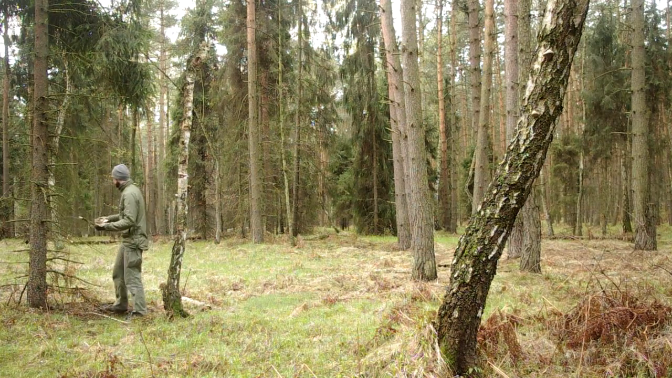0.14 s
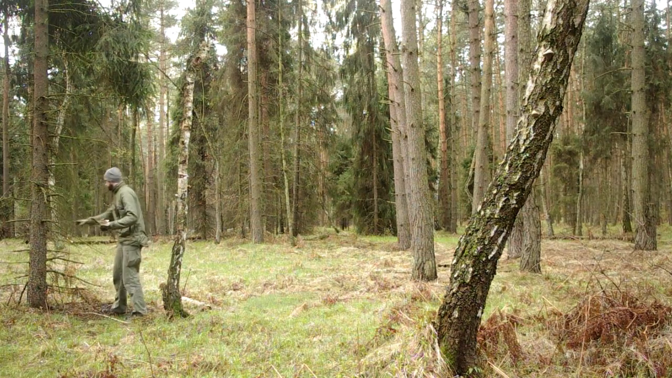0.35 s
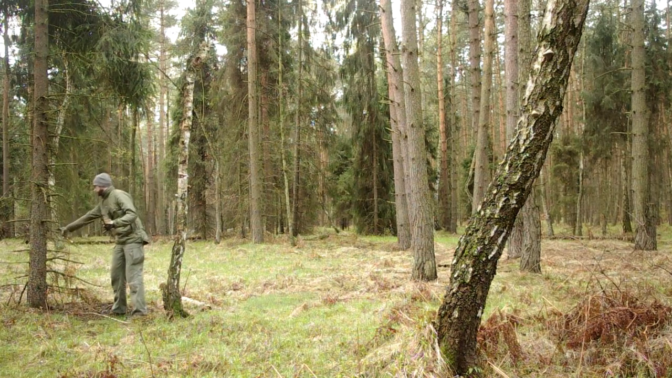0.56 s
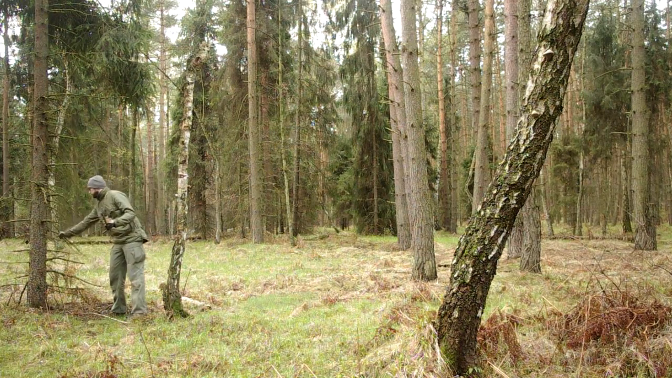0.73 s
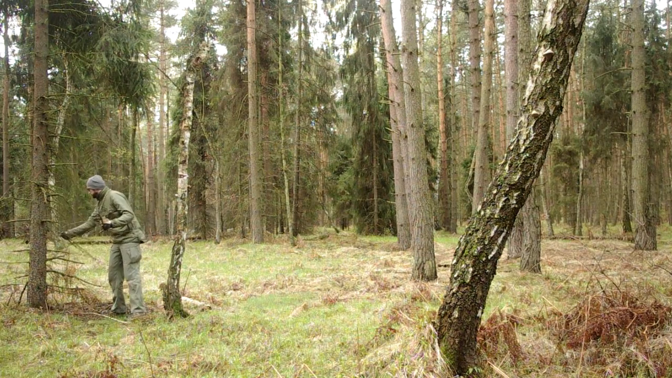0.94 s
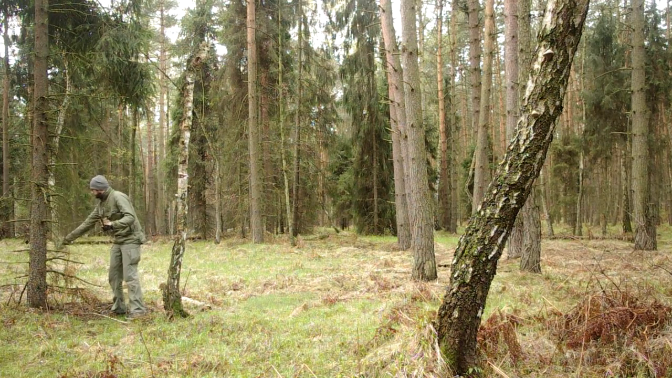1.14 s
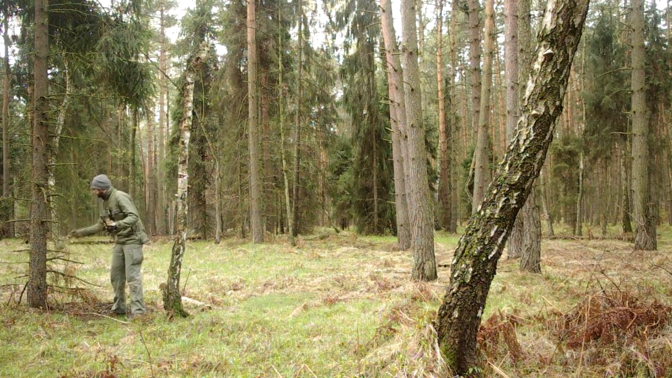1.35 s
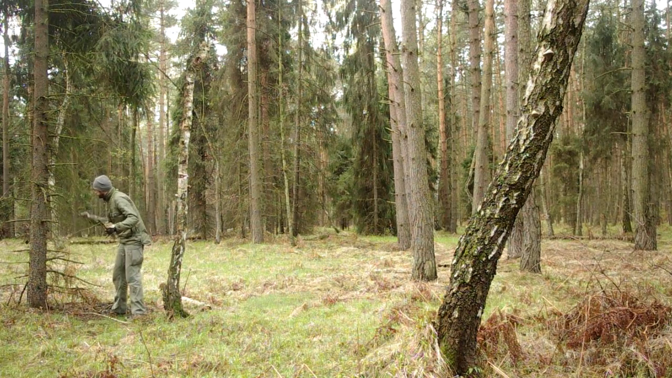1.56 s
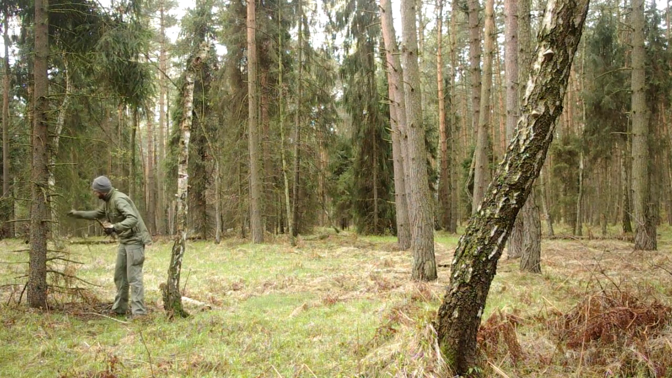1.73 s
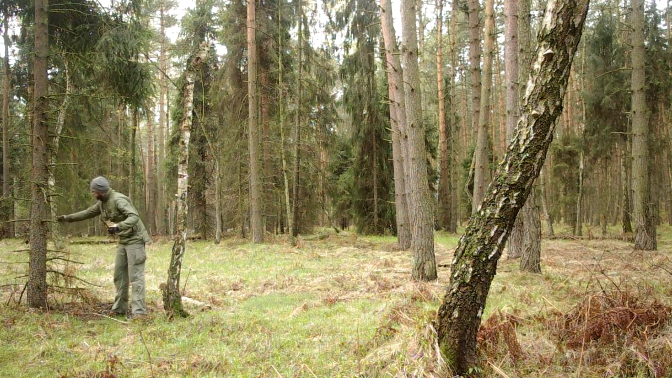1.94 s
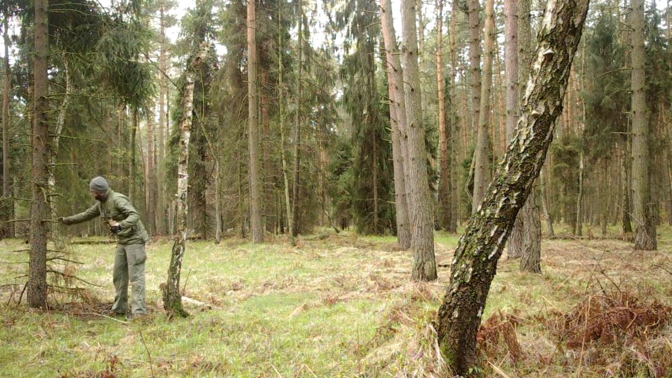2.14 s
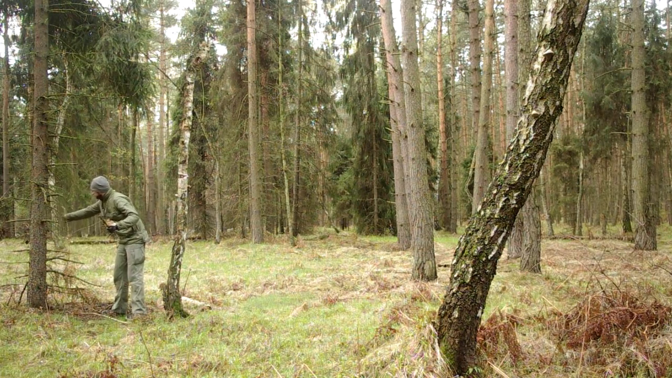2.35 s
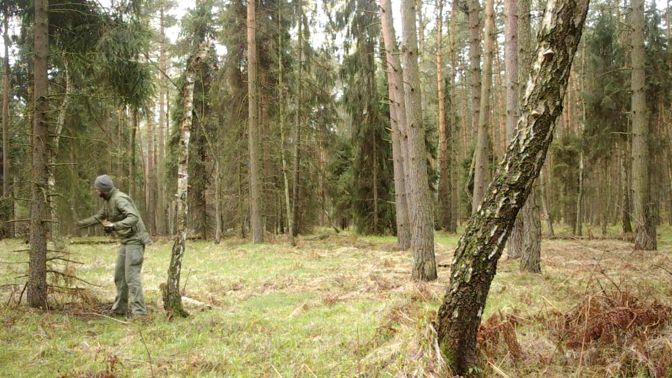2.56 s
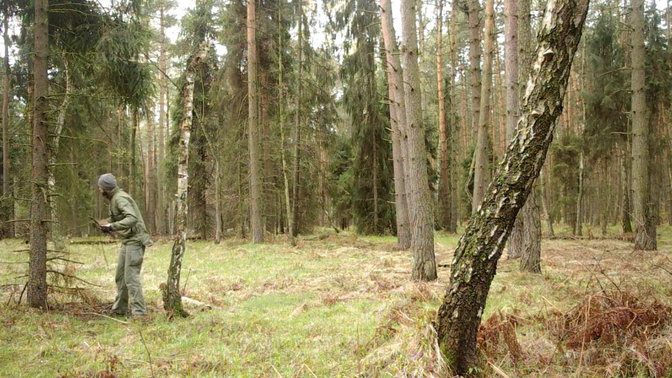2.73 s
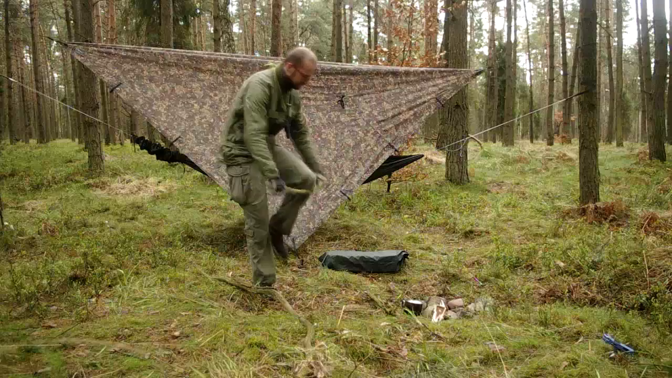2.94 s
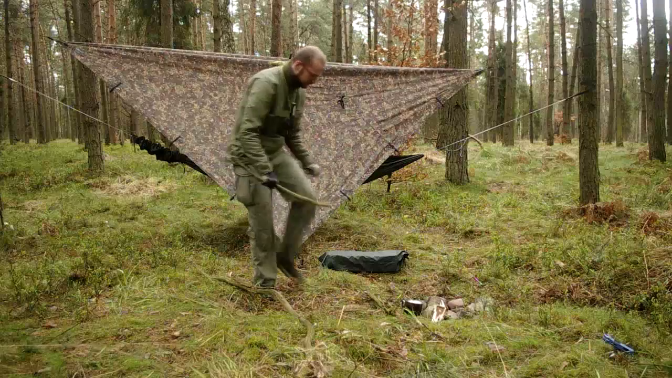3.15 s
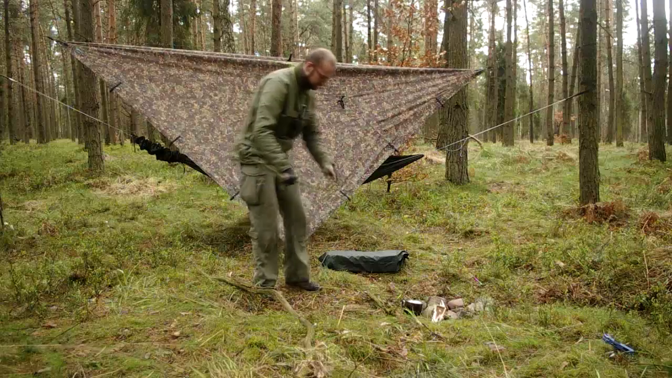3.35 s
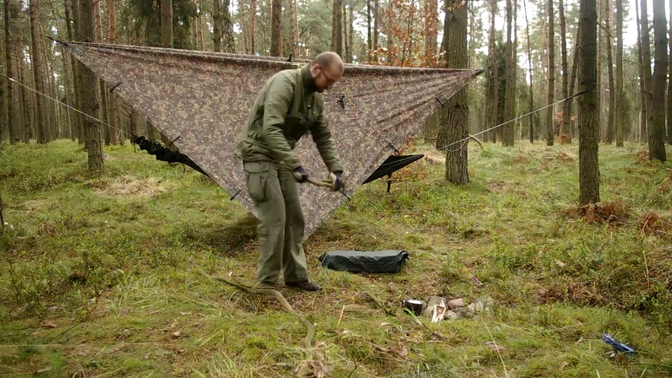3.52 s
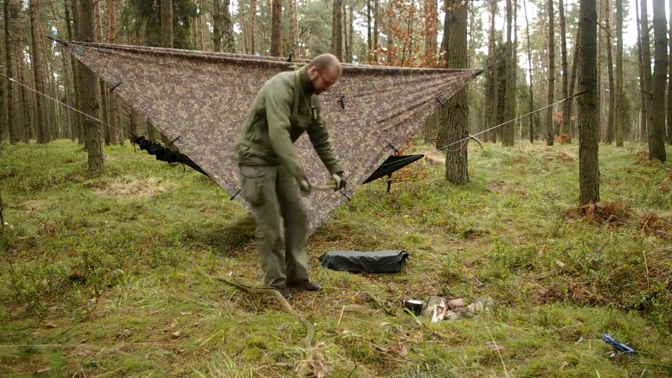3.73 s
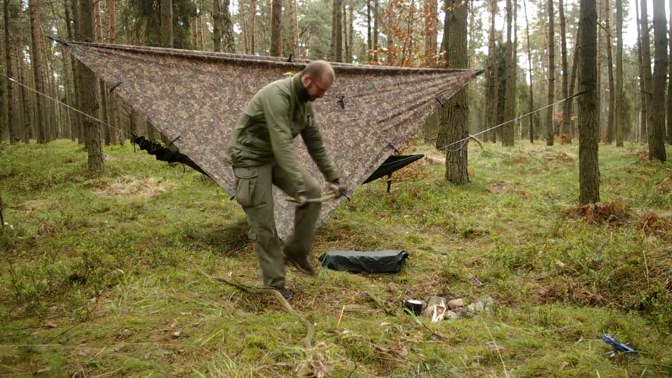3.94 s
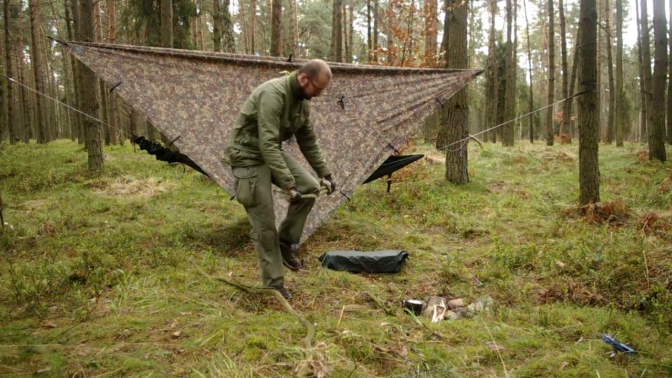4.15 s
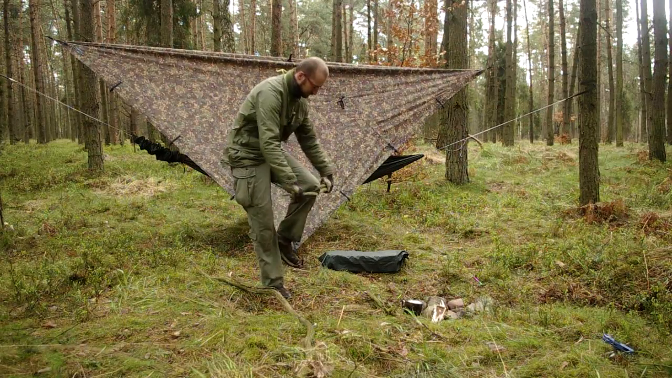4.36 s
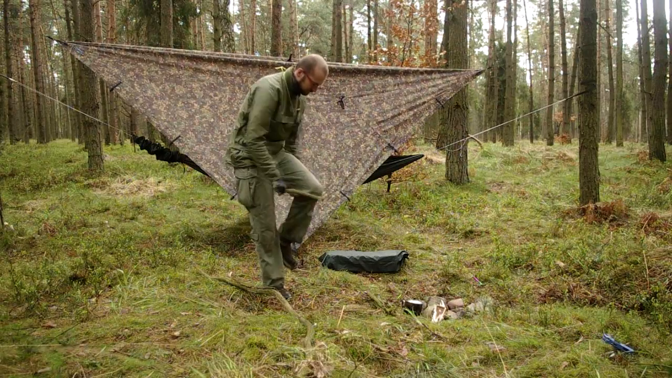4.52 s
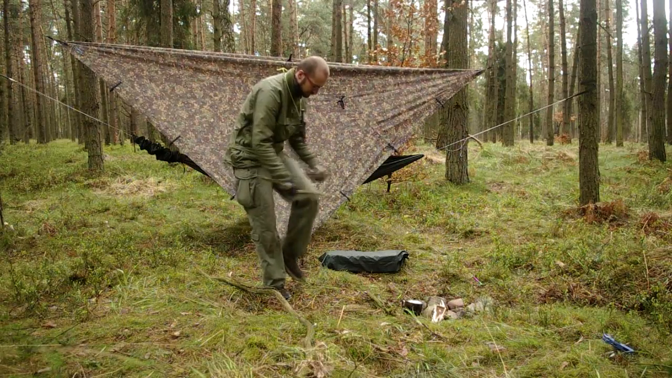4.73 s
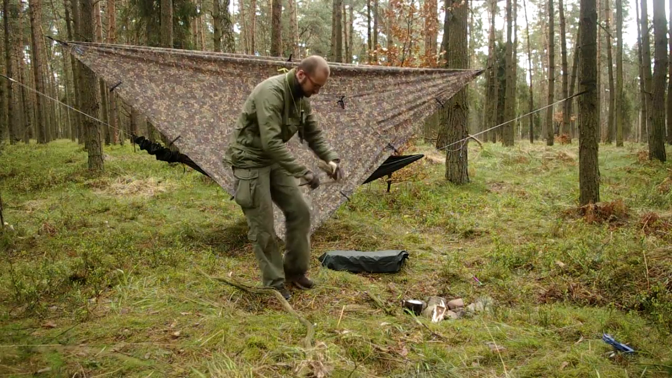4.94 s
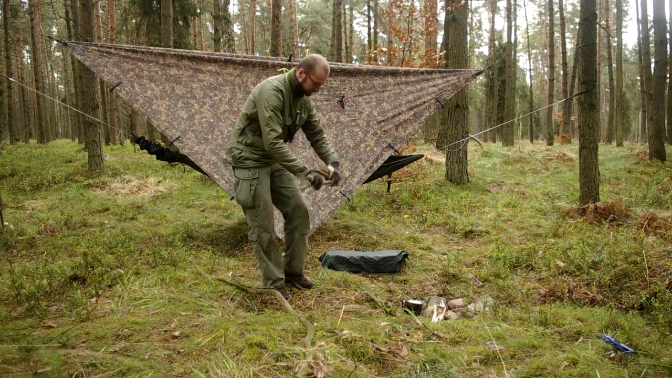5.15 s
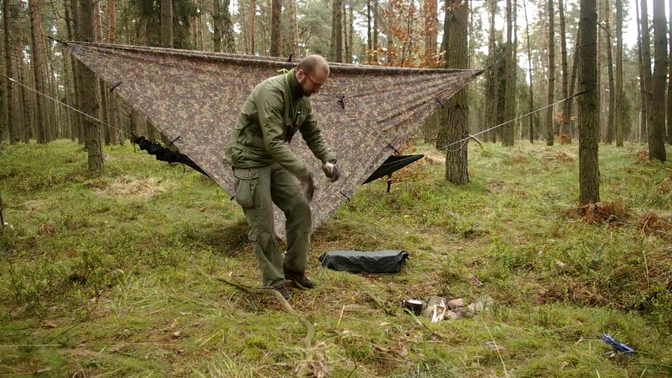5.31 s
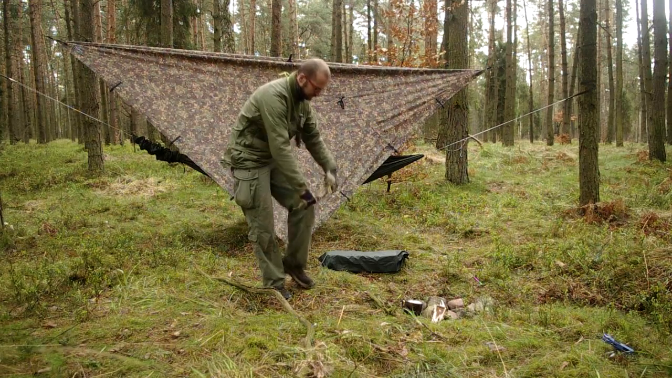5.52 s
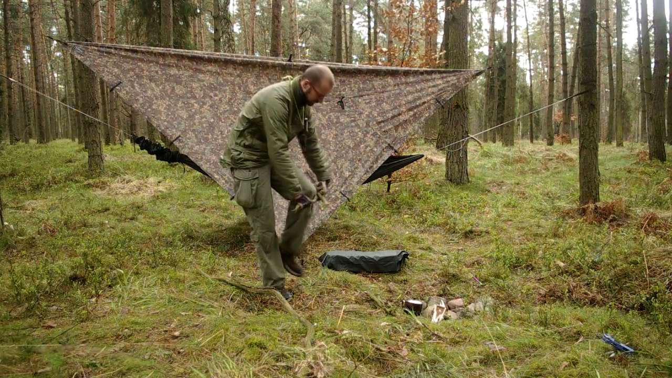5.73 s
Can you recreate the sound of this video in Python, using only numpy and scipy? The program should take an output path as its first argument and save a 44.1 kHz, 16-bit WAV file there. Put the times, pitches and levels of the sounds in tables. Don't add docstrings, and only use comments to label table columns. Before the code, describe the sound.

A calm pine forest in stereo, with low soft wind throughout. From 0 s a high bird whistles short, nearly pure notes with treetop reverberation until about 0.8 s; a lower whistler sings from 1.1 to 2.1 s, and a faint distant bird chirps in between. Tiny dry ticks thicken from 0.3 s as a branch bends; it cracks sharply at 1.0 and 1.15 s, bright and brittle, with sparse trunk echoes, then splinter ticks and rustle. A second branch ticks from 1.7 s and breaks in smaller cracks at 2.3, 2.4 and 2.5 s. At 2.94 s an abrupt cut brings a closer place with fuller low air. A very loud clipped snap bursts at 3.09 s. Cloth rustles, litter ticks, a low knock sounds at 3.43 s, a faint scrape at 3.65 s, and distant chirps near 3.85 and 4.1 s. Another clipped splintering cluster comes at 4.55-4.65 s, then quiet rustling, ticks and a short bark scrape at 5.45 s.

```python
import sys
import numpy as np
from scipy import signal
from scipy.fft import rfft, irfft
from scipy.io import wavfile
from scipy.ndimage import uniform_filter1d

SR = 44100
rng = np.random.default_rng(int(sys.argv[2]) if len(sys.argv) > 2 else 0)


def boost(x):
    u = np.asarray(x, float) / 20
    return 10 ** u


def master_out(mix):
    frames = np.transpose(np.atleast_2d(mix))
    ceiling = np.clip(frames, -1, 1)
    pcm = np.round(ceiling * 32767).astype(np.int16)
    wavfile.write(sys.argv[1], SR, pcm)


N = 259308
CUT_S = 2.937

# (frequency [Hz], level [dB])
WOOD_TONE = [(150, -56), (500, -13.5), (1000, -9.5), (2000, 0), (3500, 0.5), (7000, 2), (12000, 2.5),
             (15000, -7), (16300, -25.5)]
# (frequency [Hz], level [dB])
PORT_DIFFERENCE = [(300, -6), (1300, -14), (4400, -16), (8000, -8), (15000, -8)]


def evened(x):
    return x / np.sqrt(np.mean(x ** 2) + 1e-20)


def read(points, hz):
    f, value = np.transpose(points)
    return np.interp(np.log(hz + 1), np.log(f + 1), value)


def add(mix, s, sound, pan_db):
    part = mix[:, round(s * SR):][:, :sound.shape[-1]]
    part += boost(np.array([[.5], [-.5]]) * pan_db) * sound[..., :part.shape[1]]


def causal(gain):
    log_gain = np.log(gain)
    return np.exp(log_gain - 1j * signal.hilbert(log_gain).imag)[:len(gain) // 2 + 1]


def scatter(x, decay, onset_s):
    size, gap = 3 * SR // 2, 20
    starts = np.arange(0, size - gap, gap)
    at = starts + rng.integers(0, gap, (2, len(starts)))
    echoes = np.zeros((2, size))
    np.put_along_axis(echoes, at, rng.choice([-1., 1.], at.shape), 1)
    echoes[1] = 0.289 * echoes[0] + 0.44 * echoes[1]
    hz, t, z = signal.stft(echoes, SR, nperseg=256)
    tail = signal.istft(z * boost(-60 * t / read(decay, hz)[:, None]), SR, nperseg=256)[1]
    tail *= 1 - np.exp(-(np.arange(tail.shape[1]) / SR / onset_s) ** 2)
    return signal.fftconvolve(x, tail / np.linalg.norm(tail[0]), axes=1)[:, :N]


def sticks():
    # (time [s], peak [dB], ring [Hz], time to fall 60 dB [s], tilt [dB per octave])
    far_breaks = [
        (1.0104, -0.5, 5700, 0.0087, -2.5),
        (1.019, -8.5, 6000, 0.0036, 8),
        (1.023, -19.5, 4500, 0.058, -0.5),
        (1.1536, 2.5, 4670, 0.016, 1.5),
        (2.2816, -11, 11000, 0.0069, 2.5),
        (2.397, -14, 11000, 0.0052, 5),
        (2.4153, -6.5, 7850, 0.0082, -1),
        (2.508, -2, 5060, 0.004, 1),
        (2.517, -6.5, 6800, 0.0069, 4),
    ]
    near_breaks = [(3.085, -22, 8830, 0.027, -1), (3.084, 9.5, 4430, 0.021, 0),
                   (3.0879, 5, 3840, 0.021, -0.5), (3.091, 2.5, 4500, 0.00426, -3),
                   (3.096, -15.5, 3976, 0.027, -3), (3.101, -12.5, 4300, 0.03, 2.5),
                   (3.1222, -1.5, 3200, 0.011, -3.5), (4.5524, -6, 4330, 0.00606, 3),
                   (4.5574, 5, 3968, 0.012, 0.5), (4.5675, 0, 4100, 0.039, 8),
                   (4.5703, 4, 5990, 0.016, -2.5), (4.5743, 9.5, 4270, 0.0051, -4.5),
                   (4.5795, 6, 3500, 0.019, 2.5), (4.584, -3.5, 3100, 0.0084, 4),
                   (4.5883, -14.5, 2980, 0.044, -3.5), (4.6456, -9.5, 8500, 0.0033, -0.5),
                   (4.6482, -4.5, 3500, 0.0063, -3)]
    # (time [s], peak [dB], ring [Hz], tilt [dB per
    twig_ticks = [(0.31, -39.5, 6520, 16), (.386, -35.5, 9000, 11), (0.4706, -26.5, 9560, 2.5),
                  (0.5012, -30, 12600, -1), (.757, -36, 5320, 0), (0.8038, -17.5, 10000, 1.5),
                  (0.81, -28.5, 5140, -5.5), (.846, -31, 3810, 4.5), (0.8585, -15.5, 3900, 3.5),
                  (.8892, -30, 4910, 3), (0.9021, -21, 10600, 2.5), (0.9265, -35.5, 4180, 0.32),
                  (0.937, -30, 4230, -1.5), (0.948, -31.5, 3530, 3), (1.053, -35, 10500, -2.5),
                  (1.059, -24, 10400, 5.5), (1.073, -26, 11500, 5), (1.081, -22, 10200, -2),
                  (1.094, -29.5, 10220, 3), (1.1183, -30.5, 9000, 4), (1.1413, -21.5, 11300, 1.5),
                  (1.176, -17, 9000, -4.5), (1.201, -21.5, 9000, 15), (1.258, -21.5, 7100, 2.5),
                  (1.405, -32, 4000, 1.5), (1.431, -26.5, 4760, 2.5), (1.5021, -34.5, 4890, -2),
                  (1.7344, -40.5, 5146, -3), (1.9008, -32.5, 5500, 6), (1.92, -24.5, 4450, 1.5),
                    (2.0353, -35.5, 4780, 4), (2.0691, -28, 4000, 4.5), (2.092, -28.5, 5130, 3),
                    (2.183, -30, 9100, -0.5), (2.208, -31, 5300, 5), (2.229, -33, 4540, 2),
                    (2.3566, -34, 7000, 1), (2.3834, -30, 10870, -4), (2.442, -28, 1990, -6),
                    (2.4673, -21.5, 10900, -3), (2.557, -16.5, 11440, -2), (2.5707, -29.5, 11800, 2.5),
                    (2.585, -22.5, 11100, -1),
                  (0.907, -31.5, 10000, 1), (0.9135, -36.5, 4500, -0.5), (0.953, -37, 9000, -3),
                 (1.187, -27.5, 9000, 0), (1.215, -22, 12500, 2), (1.2214, -24, 10500, 0),
                 (1.263, -23, 12000, -1), (1.275, -33, 11500, 5.5), (1.282, -29, 12000, 4.5),
                 (1.346, -34, 5500, -3), (1.931, -32.5, 6000, -2.5), (2.135, -44, 7930, 2),
                 (2.3155, -40, 4960, 0), (2.3266, -36.5, 5500, 1), (2.378, -39, 10000, 1.5),
                 (2.4206, -24, 9000, 4), (2.602, -39, 11600, 4.5), (4.5437, -37, 11000, 2),
                 (4.5643, -21, 11500, 2), (4.6397, -35.5, 11000, 1), (4.6435, -26.5, 9000, 1),
                 (4.654, -26.5, 9000, -6.5)]
    near_ticks = [(3.4296, -29.5, 1860, -1), (3.468, -39.5, 3680, -3.5), (3.5932, -31, 4030, -3.5),
                  (3.6572, -39, 3810, -23), (3.689, -30.5, 4200, -5), (4.322, -40, 4145, 0),
                  (4.354, -38.5, 3580, 4), (4.4136, -33, 3600, -1.5), (4.8337, -39.5, 10310, 6.5),
                  (5.004, -32.5, 2440, -4.5), (5.148, -34, 4800, -9), (5.422, -33.5, 8580, 3),
                  (5.445, -35, 4500, -7)]
    # (time [s], peak [dB], pitch [Hz], time to fall 60 dB [s])
    knocks = [(0.468, -36.5, 99, 0.12), (0.501, -25, 195, 0.02), (3.432, -27.5, 301.9, 0.048),
              (3.087, -37.5, 170, 0.16), (1.01, -25.5, 290, 0.12), (1.011, -63, 484, 0.019),
              (1.154, -28, 387, 0.011), (2.416, -25.5, 1600, 0.033), (2.444, -29.5, 1680, 0.022),
              (2.466, -49, 1600, 0.031), (2.517, -32, 1615, 0.031), (3.086, -10, 339, 0.012),
              (3.429, -33.5, 130.5, 0.33), (3.431, -26, 238.5, 0.039), (3.469, -26.5, 421, 0.014),
              (4.557, -14, 296, 0.0067), (4.649, -24, 372, 0.02), (1.011, -33.5, 1850, 0.14),
              (1.166, -32.5, 900, 0.038), (4.572, -23, 498, 0.0042), (4.5813, -23, 1180, 0.0097),
              (3.45, -27.5, 146, 0.053), (4.648, -22.5, 1000, 0.014)]
    # (time [s], [(pitch [Hz], peak [dB], time to fall 60 dB [s])])
    rings = [(0.8584, [(4100, -28, 0.0077), (3610, -34, 0.0062)]), (2.069, [(3980, -31.5, .008),
             (6000, -45, .006)]), (1.0102, [(1621, -14.5, 0.014), (2206, -15, 0.017), (3140, -10.5, 0.0133),
             (5350, -15.5, 0.017), (6610, -22.5, 0.0096), (9030, -12, 0.0098), (9260, -20, 0.015),
             (11470, -12, 0.014)]), (1.154, [(1668, -17, 0.03), (2015, -5.5, 0.017), (2814, -2.5, 0.016),
             (4660, -13.5, 0.0077), (5010, -20.5, 0.02), (7840, -6.5, 0.011), (8800, -6, 0.016),
             (10720, -9, 0.022), (13640, -17.5, .008), (15540, -7.5, 0.0152), (1168, -19, .02)]),
             (2.2811, [(4920, -13.5, 0.0043), (6150, -23, 0.0065), (7440, -16.5, 0.0068),
             (10680, -12, 0.008)]), (2.4162, [(2820, -34, 0.02), (3920, -14.5, 0.0079),
             (5070, -15.5, 0.011)]), (2.5086, [(2640, -26, 0.0029), (4820, -6, 0.0063),
             (5870, -11.5, 0.004), (7130, -11.5, 0.0052), (9000, -22.5, .006), (11670, -18, .005),
             (12660, -14.5, .006)]), (3.0847, [(2704, -6.5, 0.036), (3126, -6, 0.029), (3657, -3.5, 0.02),
             (4040, 3, 0.018), (5060, -17, 0.022), (7390, -17, .025), (11350, -15, 0.017),
             (14260, -16, .015)]), (3.1221, [(2575, -16, 0.014), (3620, -9, 0.012), (4980, -12, 0.016)]),
             (4.5583, [(2790, -16.5, 0.022), (3680, -8.5, .009), (8900, -12.5, 0.0051)]),
             (4.57, [(1773, -2, 0.0091), (4330, -9.5, 0.026), (5850, -8, 0.0102)]),
             (4.5801, [(3275, -9, 0.02), (3600, -8.5, 0.028), (6190, -6.5, 0.0102)]),
             (4.6485, [(1290, -32, 0.0028), (2770, -14, 0.0062), (4800, -17.5, 0.0094), (7940, -26, .006)]),
             (3.4305, [(790, -31, .012)]), (5.472, [(1550, -46, .06), (1810, -40, 0.05)])]
    # (frequency [Hz], time to fall 60 dB [s])
    trunk_decay = [(300, 0.34), (1500, 0.73), (3000, 0.83), (6000, 0.61), (14000, 0.13)]

    twig_t60_s, litter_t60_s = 0.0071, 0.03
    twig_snap, break_snap = 4.1, 4.05
    cracks = [(*event, break_snap) for event in far_breaks + near_breaks]
    for s, db, hz, tilt_db in twig_ticks:
        cracks.append((s, db, hz, twig_t60_s, tilt_db, twig_snap))
    for s, db, hz, tilt_db in near_ticks:
        cracks.append((s, db, hz, litter_t60_s, tilt_db, break_snap))

    dry, blows = np.zeros((2, 2, N))
    plain = irfft(causal(boost(read(WOOD_TONE, abs(np.fft.fftfreq(512, 1 / SR))))))
    plain /= np.linalg.norm(plain)
    for s, db, hz, t60, tilt_db, snap in cracks:
        sound = crack(db, hz, t60, tilt_db, snap)
        add(dry, s + .0004, sound, pan_db=4 if s < CUT_S else -1.7)
        add(blows, s, plain * np.linalg.norm(sound[0]), 0)
    for s, db, hz, t60 in knocks:
        add(dry, s, knock(db, hz, t60), 0)
    for s, modes in rings:
        sound = ring(modes)
        add(dry, s, sound, 0)
        add(blows, s, plain * np.linalg.norm(sound[0]), 0)
    return dry + boost(-25.5) * scatter(blows, trunk_decay, onset_s=0.015)


def crack(db, hz, t60, tilt_db, snap):
    t, f = np.arange(4096) / SR, abs(np.fft.fftfreq(4096, 1 / SR))
    tearing = boost(-60 * t / t60)
    patter = boost(-21 - 60 * t / (3.3 * t60))
    tear = rng.standard_normal((2, 4096)) * (tearing + patter) * (1 - np.exp(-t / 0.00005))
    tear[0, 2] += snap
    resonance = 1 + 1.9 / (1 + ((f - hz) / (0.15 * hz)) ** 2)
    tilt = tilt_db * np.log2((f + 300) / 4000)
    colour = causal(boost(read(WOOD_TONE, f) + tilt) * resonance)
    width = [np.ones(2049), boost(read(PORT_DIFFERENCE, f[:2049]))]
    mid, side = irfft(rfft(tear) * colour * width)
    return boost(db) * np.array([mid + side, mid - side]) / abs(mid).max()


def ring(modes):
    hz, db, t60 = np.transpose(modes)[..., None]
    t = np.arange(3000) / SR
    rise = 1 - np.exp(-t / 0.00013)
    each = boost(db - 60 * t / t60) * np.sin(2 * np.pi * hz * t) * rise
    side = each * boost(read(PORT_DIFFERENCE, hz)) * (-1.) ** np.arange(len(hz))[:, None]
    return np.array([(each + side).sum(axis=0), (each - side).sum(axis=0)])


def knock(db, hz, t60):
    t = np.arange(6000) / SR
    rough = evened(uniform_filter1d(rng.standard_normal(6000), int(SR / hz * 3)))
    modes = np.sin(2 * np.pi * hz * t) + 0.58 * rough * np.sin(2 * np.pi * 1.25 * hz * t)
    return boost(db - 60 * t / t60) * modes * (1 - np.exp(-t / 0.00028))


def scrapes():
    # (start [s], length [s], pitch [Hz], level [dB])
    scuffs = [
        (3.634, 0.11, 1620, -49.5),
        (3.677, 0.015, 3000, -45),
        (5.452, 0.0158, 1865, -38),
        (5.463, 0.037, 1705, -45.5),
    ]
    dry = np.zeros((2, N))
    for s, length, hz, db in scuffs:
        add(dry, s, scuff(length, hz, db), 0)
    return dry


def scuff(length, hz, db):
    f = np.fft.rfftfreq(4096, 1 / SR)
    hollow = 1 / (1 + ((f - hz) / (0.91 * hz)) ** 2)
    rub = irfft(rfft(rng.standard_normal((2, 4096))) * hollow)[:, :round(length * SR)]
    return boost(db) * evened(rub[0] + 0.128 * rub) * signal.windows.tukey(rub.shape[1], .5)


def birds():
    # (start [s], length [s], held pitch [Hz], last pitch [Hz], level [dB])
    high_flicks = [(.008, 0.12, 6155, 5730, -53.5), (.43, 0.055, 6550, 5530, -54.5),
                   (.55, 0.041, 6320, 5640, -54), (.642, 0.056, 6140, 4930, -54),
                   (.722, 0.028, 6100, 5370, -53.5)]
    low_flicks = [(1.114, .028, 2213, 1950, -46.5), (1.482, 0.04, 2579, 2403, -41),
                  (1.75, .097, 2900, 2300, -51)]
    far_flicks = [(1.808, 0.034, 7200, 8300, -63), (2.04, 0.055, 6800, 5000, -66),
                  (2.75, 0.067, 6650, 4940, -66), (1.68, .055, 7100, 5100, -66)]
    # (start [s], length [s], first pitch [Hz], settled pitch [Hz], level [dB])
    high_slides = [(0.196, 0.14, 6110, 6530, -57.5), (0.382, .045, 6150, 6570, -61),
                   (0.747, 0.026, 5900, 4840, -49.5)]
    low_slides = [(1.29, 0.07, 1830, 1890, -55), (1.324, 0.125, 1900, 2150, -45),
                  (1.88, .09, 2880, 2860, -61), (1.07, 0.0425, 1930, 2012, -55),
                  (1.71, 0.031, 2150, 2274, -56.5), (1.851, 0.108, 1718, 1694, -52),
                  (1.973, 0.045, 1990, 2215, -45), (2.018, 0.066, 2150, 2060, -49.5)]
    far_slides = [(1.105, 0.033, 5300, 4700, -48.5), (1.545, 0.04, 5400, 5600, -63),
                  (1.6, 0.05, 5650, 5600, -64), (1.65, .03, 5900, 5300, -64), (1.99, .04, 5500, 4300, -68),
                  (1.729, 0.028, 5280, 5220, -59), (1.765, 0.088, 5620, 4800, -64),
                  (1.93, 0.098, 4750, 4800, -66.5), (2.09, 0.11, 4800, 4730, -65),
                  (1.848, 0.11, 7170, 4134, -54.5), (2.206, 0.093, 5520, 4030, -57.5),
                  (2.61, 0.032, 4070, 4070, -57), (2.719, 0.14, 4620, 4620, -65),
                  (3.85, 0.021, 4165, 4230, -51), (4.105, 0.041, 4124, 4320, -55.5),
                  (.822, .02, 3540, 4020, -60), (.872, .018, 3530, 3930, -60),
                  (.936, .016, 4130, 3440, -56)]

    high = bird(high_flicks, high_slides, flick_s=0.00874, slide_s=0.01, sag_db=3.5, pan_db=-1.5,
                waver=0.0056, trill=0.0059, wet_db=-0.5)
    low = bird(low_flicks, low_slides, flick_s=0.0158, slide_s=0.0167, sag_db=2, pan_db=-8.5,
               waver=0.011, trill=0, wet_db=-4)
    far = bird(far_flicks, far_slides, flick_s=0.04, slide_s=0.016, sag_db=-0.5, pan_db=-3.5,
               waver=0.011, trill=0.007, wet_db=-1)
    return (high + low) * (np.arange(N) / SR < CUT_S) + far


def bird(flicks, slides, flick_s, slide_s, sag_db, pan_db, waver, trill, wet_db):
    # (frequency [Hz], time to fall 60 dB [s])
    crown_decay = [(1500, 1.4), (3000, 1.74), (4500, 1.2), (7000, 0.57)]
    trill_hz = 140
    dry = np.zeros((2, N))
    for k, (s, length, first_hz, last_hz, db) in enumerate(flicks + slides):
        t = np.arange(0, max(length, .01), 1 / SR)
        if k < len(flicks):
            glide = np.exp((t - t[-1]) / flick_s)
        else:
            glide = 1 - np.exp(-t / slide_s)
        wobble = evened(uniform_filter1d(rng.standard_normal(SR // 2), 200))[:len(t)]
        unsteady = 1 + waver * wobble + trill * np.sin(2 * np.pi * trill_hz * t)
        pitch = (first_hz + (last_hz - first_hz) * glide) * unsteady
        turns = np.cumsum(pitch) / SR
        loudness = boost(db + sag_db * (t / t[-1]) ** 2 + 1.1 * wobble[::-1])
        note = np.sqrt(2) * loudness * np.sin(2 * np.pi * turns)
        add(dry, s, note * signal.windows.tukey(len(t), .2), pan_db)
    return dry + boost(wet_db) * scatter(dry, crown_decay, onset_s=0.0037)


def rustle():
    # (start [s], length [s], level [dB])
    rubs = [(0.466, 0.048, -66), (0.625, 0.124, -76), (0.81, 0.1, -63), (1.045, 0.061, -56),
            (1.187, 0.089, -47.5), (1.33, 0.18, -61), (2.39, 0.18, -58), (2.619, 0.1, -65.5),
            (2.977, 0.0228, -54.5), (3.115, 0.1, -50.5), (3.358, 0.15, -62), (3.607, 0.134, -60.5),
            (3.798, 0.0325, -46), (3.97, 0.079, -54), (4.101, 0.14, -62.5), (4.259, 0.073, -60),
            (4.394, 0.026, -66.5), (4.595, 0.094, -49.5), (4.966, 0.037, -58.5), (5.046, 0.17, -61.5),
            (5.372, 0.099, -57), (5.542, 0.08, -59.5), (5.698, 0.038, -56.5), (5.847, .06, -55.5)]
    # (frequency [Hz], level [dB per Hz])
    rub_tone = [(400, -38.5), (900, 7.5), (1800, 12), (4400, 16), (7400, 8), (12000, 11), (15500, 0)]
    rise_db_per_s, fall_db_per_s, still_db = 254, 213, -77.5

    flicker = evened(uniform_filter1d(rng.standard_normal(N), 150))
    pricks = rng.exponential(1, N) * (rng.random(N) < 160 / SR)
    crackle = 1 + 0.51 * signal.lfilter([1], [1, -np.exp(-1 / (0.0011 * SR))], pricks)
    t, level = np.arange(N) / SR, boost(still_db)
    for s, length, db in rubs:
        before, after = np.maximum(s - t, 0), np.maximum(t - s - length, 0)
        level = level + boost(db - rise_db_per_s * before - fall_db_per_s * after)
    cloth = hiss(rub_tone, size=256, patchy_db=-0.5, likeness=1.55)
    return level * boost(0.43 * flicker + 5) * evened(cloth * crackle)


def air():
    # (frequency [Hz], level [dB per Hz])
    far_tone = [(12, -41), (30, -12.5), (60, 5), (112, -6), (177, -4.5), (387, -12), (455, -17),
                (1370, -26.5), (1680, -21), (2110, -28), (3930, -31.5), (5720, -29.5), (6210, -37),
                (6730, -35), (12500, -37.5) ]
    near_tone = [(12, -41.5), (30, -11.5), (54, 0.5), (81, -2.5), (232, -9), (273, -11), (420, -12),
                 (646, -16.5), (1850, -22.5), (2290, -30), (3620, -32), (4870, -36.5), (7100, -45.5),
                 (12500, -42.5), ]
    swap = np.clip((np.arange(N) / SR - CUT_S) / 0.0034, 0, 1)
    far = boost(-47) * evened(hiss(far_tone, size=1024, patchy_db=1.5))
    near = boost(-41.5) * evened(hiss(near_tone, size=1024, patchy_db=.7))
    return far * (1 - swap) + near * swap


def hiss(tone, size, patchy_db, likeness=0.89):
    # (frequency [Hz], likeness [0 to 1])
    alike = [(60, 0.52), (150, 0.74), (380, 0.615), (950, 0.69), (2380, 0.67), (5980, 0.57), (15000, 0.4)]
    # (frequency [Hz], left minus right [dB])
    balance = [(30, 6.5), (80, 0.5), (200, 1.5), (8000, -0.3)]
    frames, hz = 4 * N // size + 5, np.fft.rfftfreq(size, 1 / SR)[:, None]
    a, b, c, d, patches = rng.standard_normal((frames, len(hz), 5)).T
    patches = evened(uniform_filter1d(uniform_filter1d(patches, 8, 0), 10, 1))
    same = np.clip(likeness * read(alike, hz), -1, 1)
    left, other = a + 1j * b, c + 1j * d
    right = same * left + np.sqrt(1 - same ** 2) * other
    lean = boost(read(balance, hz) / 2)
    z = np.array([left * lean, right / lean]) * boost(read(tone, hz) + patchy_db * patches)
    return signal.istft(z, nperseg=size, noverlap=3 * size // 4)[1][:, :N]


def scene():
    return sticks() + scrapes() + birds() + rustle() + air()


def low_pass(x):
    return signal.sosfilt(signal.butter(12, 16410, fs=SR, output="sos"), x)


def record(dry):
    overloaded = np.clip(dry, -1, 1)
    return low_pass(overloaded)


dry = scene()
out = record(dry)
master_out(out)
```